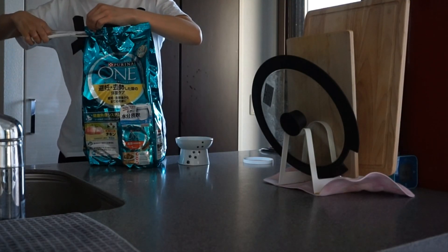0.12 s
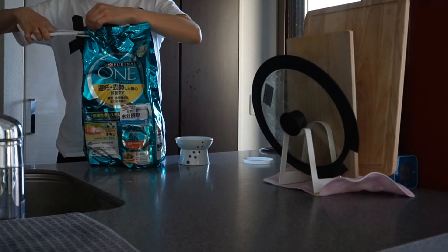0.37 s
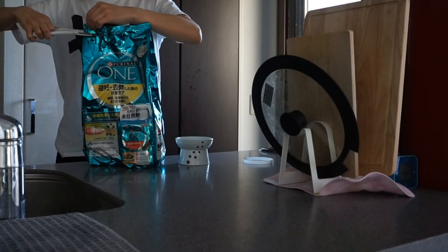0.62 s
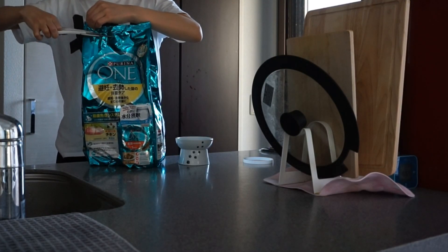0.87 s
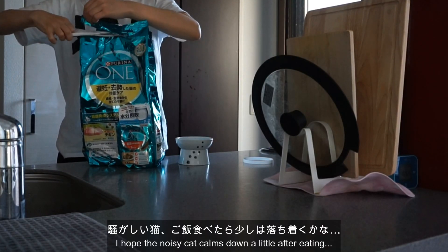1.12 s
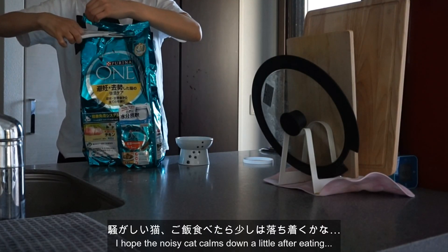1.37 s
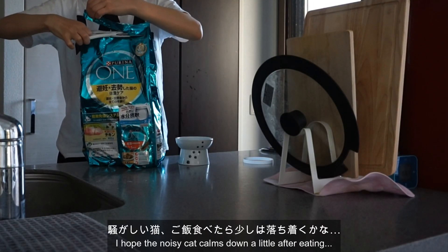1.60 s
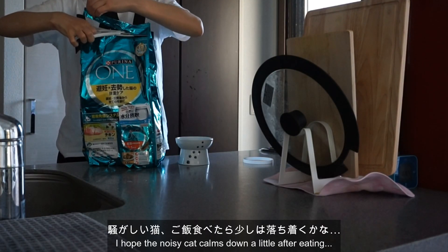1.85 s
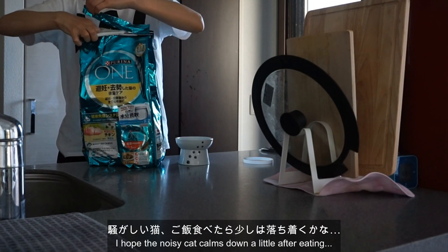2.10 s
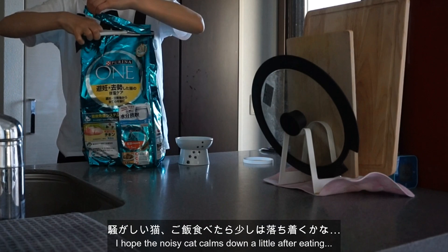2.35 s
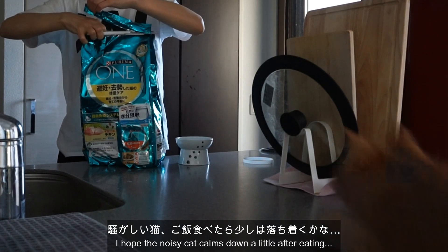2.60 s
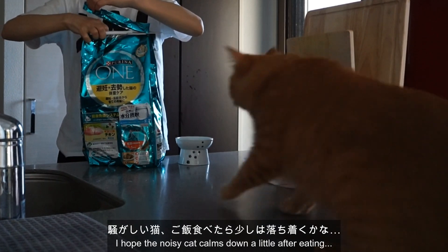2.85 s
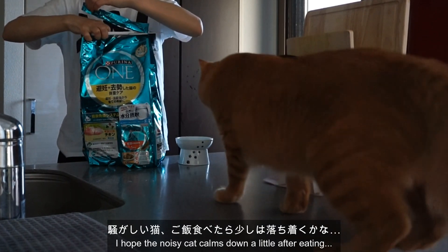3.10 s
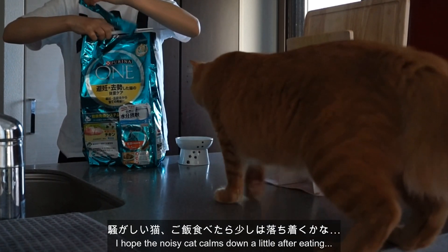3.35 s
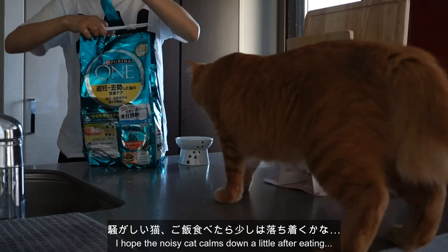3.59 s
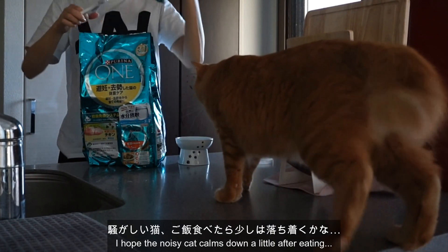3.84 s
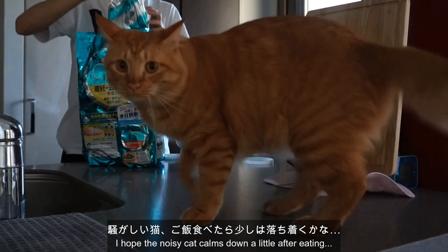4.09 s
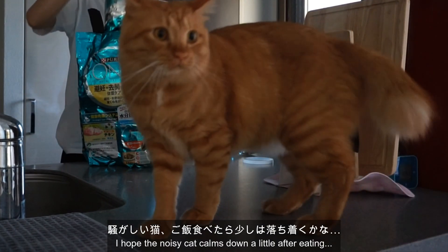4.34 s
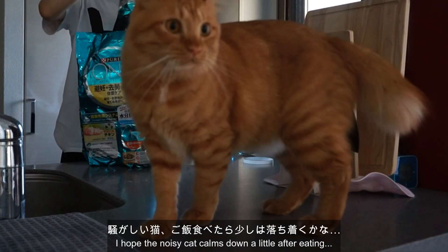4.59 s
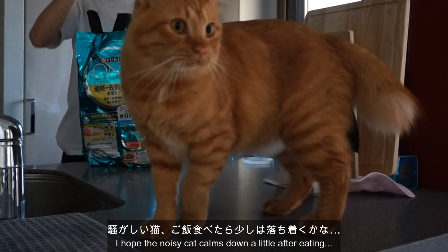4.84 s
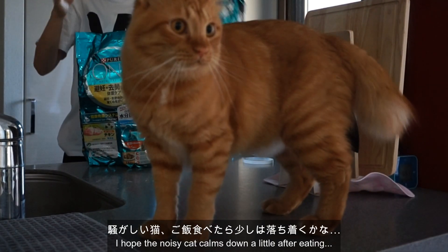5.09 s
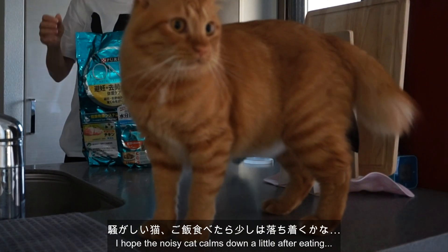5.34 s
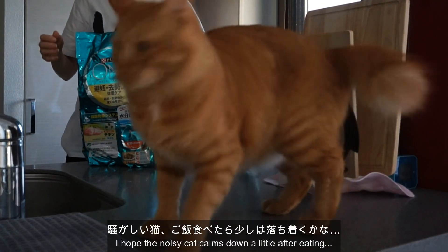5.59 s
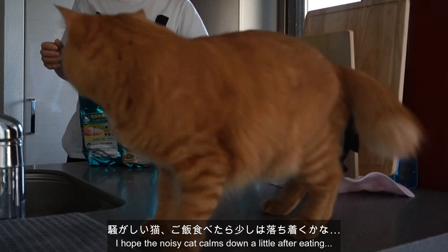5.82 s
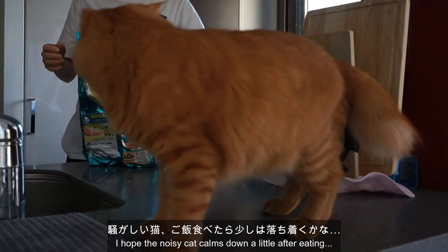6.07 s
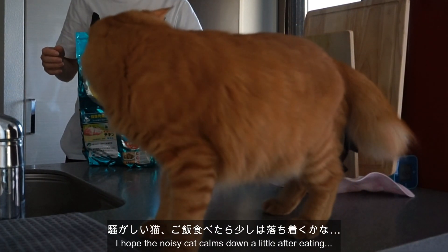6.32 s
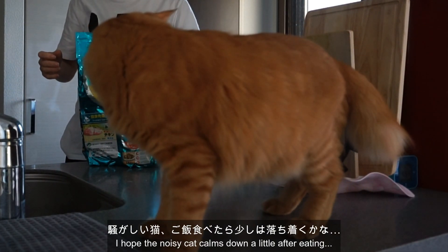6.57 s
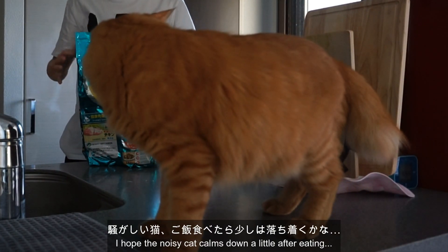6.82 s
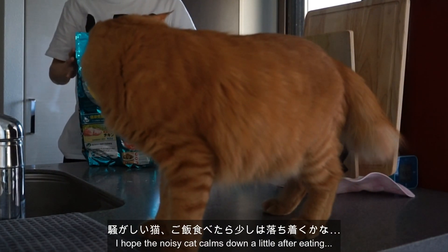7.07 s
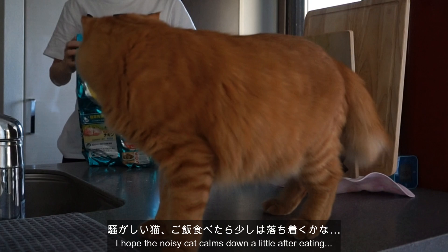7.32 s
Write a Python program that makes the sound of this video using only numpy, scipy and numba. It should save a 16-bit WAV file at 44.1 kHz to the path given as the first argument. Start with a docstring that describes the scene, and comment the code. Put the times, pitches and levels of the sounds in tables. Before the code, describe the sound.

A stiff foil bag crackles and rustles close by in a quiet kitchen, busy at first, thinning out, then snapping sharply again.

```python
"""Foil snaps singly and in swarms, over soft thuds and a faint hum: hands work the top of a tall foil bag
of dry food, a little left of a small recorder on a kitchen counter.
Snaps and rustle are crowds of short sines, panel pops and cracks single ones; resonances add the bag's air.
Filtered noise makes the counter thuds, the dull bag body and the murmur; a sine adds a high whine.
Hard walls answer with decaying noise, the treble dying sooner than the bass."""
import sys
import numpy as np
from scipy import signal
from scipy.fft import rfft, irfft, next_fast_len
from scipy.io import wavfile
from numba import njit

SR = 44100
rng = np.random.default_rng(int(sys.argv[2]) if len(sys.argv) > 2 else 0)


def wrap_up_sound(samples):
    """Save the sound to the file named by the first command line argument, as 16-bit audio."""
    columns = np.atleast_2d(samples).T
    # keep every value between -1 and 1, then stretch to whole-number steps
    tamed = np.clip(columns, -1, 1)
    steps = np.round(tamed * 32767).astype(np.int16)
    wavfile.write(sys.argv[1], SR, steps)


def how_loud(loudness_db):
    """Turn decibels into a plain amplitude multiplier (0 dB gives 1, 20 dB gives 10)."""
    steps = np.asarray(loudness_db, float) / 20
    return 10 ** steps


N = 328104
TIME_S = np.arange(N) / SR
SPOTS = 3  # places on the bag, each with its own echo
OPPOSITE = np.array([[1], [-1]])  # left, right

# Folds giving way. Each row: start in seconds, relative levels of sheet, deep folds and fine wrinkles
# in dB, length in ms.
SNAPS = [(0.035, -52, -74, -64, 2.5), (0.045, -50, -70, -61, 2), (0.1595, -54, -51.5, -64, 1.84),
         (0.189, -46, -63, -53.5, 4.15), (0.249, -56, -62, -69, 3.2), (0.4428, -62, -70, -66, 5.2),
         (0.4623, -39, -44, -40, 6.2), (0.5133, -50, -43.5, -38.5, 1.3), (0.5211, -36, -80, -49, 3.16),
         (0.6021, -44, -74, -54.5, 4.4), (0.6201, -43.5, -49, -61, 3.55), (0.678, -63, -82, -51.5, 4.5),
         (0.7522, -52, -58, -67, 2.6), (0.7739, -43, -49.5, -48, 5.3), (0.8263, -36, -43.5, -39, 4.5),
         (0.9032, -41.5, -47.5, -51.5, 5.4), (0.937, -61, -55, -48, 3.1), (0.981, -32, -35, -55.5, 5.3),
         (0.9914, -38.5, -44, -37.5, 5.6), (1.0122, -31.5, -49, -40.5, 5.9), (1.0241, -41, -45, -34, 5.1),
         (1.045, -39, -46, -71, 8.3), (1.104, -42, -50, -44, 5.8), (1.1674, -46, -49.5, -43.5, 3.2),
         (1.1835, -43, -46, -63, 14), (1.2502, -42, -58, -38, 1.75), (1.2571, -40.5, -49.5, -40.5, 5),
         (1.3376, -38, -51, -43, 14.5), (1.367, -33, -46.5, -40, 3.37), (1.47, -47, -63, -56, 1.55),
         (1.5021, -44, -55.5, -52.5, 15), (1.556, -46, -48.5, -49, 4.6), (1.6004, -45, -56, -60, 2.8),
         (1.612, -45, -55, -62, 3), (1.63, -41, -50.5, -45, 6.5), (1.7012, -49, -85, -55, 7.6),
         (1.7638, -45, -53.5, -57.5, 8.7), (1.8261, -45, -57, -81, 2.4), (1.869, -50, -67, -65, 6.5),
         (1.8808, -49, -53, -53, 9.7), (1.912, -38.5, -66, -53, 5.1), (1.9201, -37.5, -50, -40, 0.96),
         (1.988, -49, -81, -55, 3.4), (2.0765, -47.5, -58, -64.5, 11), (2.13, -49, -59.5, -76, 4.4),
         (2.159, -52, -62, -82, 6), (2.1672, -47, -56, -58, 2.9), (2.1852, -46, -62, -58, 1.7),
         (2.1982, -45.5, -57.5, -54, 11.2), (2.3007, -53.5, -67, -51.5, 11),
         (2.3536, -44.5, -53.5, -47, 3.36), (2.399, -48, -54, -63, 3.65), (2.4752, -37.5, -41, -45.5, 9),
         (2.6363, -44, -52, -71, 2.76), (2.6543, -43, -68, -56, 2.6), (2.6744, -49, -72, -50.5, 7.1),
         (2.7721, -47, -51, -54.5, 7), (2.8103, -47.5, -60, -57, 3.7), (2.9803, -79, -70, -68, 10),
         (3.0244, -58, -63, -61, 4.3), (3.083, -45.5, -80, -63, 2.9), (3.1434, -53.5, -90, -65, 2.2),
         (3.2236, -55.5, -58, -86, 9.3), (3.2466, -48.5, -50, -65, 9), (3.2557, -44.5, -55, -41, 5.4),
         (3.336, -52, -55, -48.5, 2.16), (3.362, -51, -67, -55, 2), (3.3782, -48.5, -76, -70, 3.8),
         (3.5403, -54.5, -98, -55.5, 2.34), (3.5853, -70, -84, -68, 5.2), (3.7083, -68, -69, -81, 4.5),
         (3.83, -68, -93, -67.5, 6.6), (3.851, -65, -84, -71, 3.7), (4.0608, -68, -72, -90, 8.4),
         (4.094, -57, -53, -60, 12.7), (4.0996, -35, -62, -38.5, 3.17), (4.1273, -39, -44, -41, 3.64),
         (4.1495, -45, -59, -49, 1.6), (4.166, -36.5, -46.5, -45, 3.8), (4.1796, -43, -59, -40, 2.6),
         (4.184, -40.5, -56, -35.5, 3.14), (4.191, -50, -53, -70, 3.4), (4.2222, -39.5, -53, -53, 3.8),
         (4.234, -44, -59, -45.5, 4), (4.325, -59, -70, -51, 1.2), (4.353, -36.5, -54, -100, 1.22),
         (4.3637, -48, -57, -53, 9.5), (4.4218, -36, -68, -43, 1.5), (4.4245, -45, -51, -53, 1.52),
         (4.4369, -44.5, -53.5, -56, 4.5), (4.4793, -43.5, -55, -54, 9.3), (4.501, -47, -66, -48.5, 3.7),
         (4.5682, -67, -72, -41.5, 4.7), (4.5804, -40, -53.5, -50.5, 6.9), (4.631, -47, -52.5, -57, 3.6),
         (4.7435, -45.5, -56, -55, 1.9), (4.751, -47.5, -59, -56, 3.5), (4.7997, -45, -56.5, -46, 8.3),
         (4.8188, -49, -77, -53, 2.7), (4.9164, -56, -72, -58, 16.4), (4.997, -60, -77, -61, 3.6),
         (5.043, -54.5, -68, -53.5, 19.3), (5.079, -50, -59.5, -58, 9.9), (5.1501, -73, -49.5, -71, 11.6),
         (5.1784, -55, -66, -57, 4), (5.2947, -52.5, -66, -63, 12.2), (5.3183, -50.5, -69, -65, 6.2),
         (5.4062, -51, -47, -58, 7.9), (5.418, -46.5, -49.5, -48, 6.8), (5.5585, -46.5, -77, -93, 3.1),
         (5.618, -58, -60, -64, 4.5), (5.629, -53, -52, -68, 2.74), (5.8144, -63, -73, -76, 12.6),
         (5.8918, -57.5, -72, -53, 11.5), (5.971, -59, -55, -60, 4.7), (6.0625, -50, -49.5, -82, 6.5),
         (6.0967, -45, -46.5, -47, 2.7), (6.116, -49, -50, -45, 2.8), (6.1358, -48, -43.5, -53, 5.2),
         (6.165, -56, -45.5, -57, 3.5), (6.2805, -48.5, -54.5, -97, 9.7), (6.3064, -80, -64, -56.5, 7),
         (6.396, -55, -62, -62, 7.6), (6.4769, -54, -59, -95, 6.2), (6.9341, -57, -55, -87, 14.3),
         (6.951, -53, -79, -71.5, 3.5), (7.091, -52, -54, -71, 9.4), (7.152, -49, -72, -81, 1.4),
         (7.196, -47, -60, -72, 3.9), (7.2076, -48, -52, -66, 7.3), (7.4018, -40, -45, -48.5, 4.8),
         (7.413, -36.5, -44, -64, 3.35), (7.4228, -33.5, -41, -45, 4.8)]
# Foil creasing on after a snap. Rows for sheet, deep folds, fine wrinkles: dB against the snap, decay in seconds.
SETTLE = [(-5.5, 0.021), (8, 0.024), (-4.5, 0.036)]
# How hard the hands work the foil and how loosely it is held. Each row: time in seconds,
# relative crease level in dB, dullness in dB.
GRIP = [(0, -42, 3), (.14, -56, 6), (.27, -49, -1), (.43, -55.5, 1.5), (.66, -39.5, -0.5),
        (.76, -48.5, 3.5), (.89, -34, 1.5), (.96, -38, 3), (1.08, -34.5, 2), (1.2, -38, -0.5),
        (1.35, -35.5, 1), (1.49, -41, -1), (1.78, -44, 4), (2.03, -47, 2.5), (2.22, -48, 2),
        (2.45, -51.5, 0), (2.65, -42, 3.5), (2.78, -50, 5.5), (3.2, -56.5, 4), (3.42, -52.5, 6),
        (3.65, -60.5, 1), (4.1, -68, 5), (4.28, -43.5, 2), (4.34, -43.5, 2), (4.54, -38, -0.5),
        (4.72, -49, 5), (5.01, -51.5, 1), (5.2, -44.5, 0.5), (5.45, -45.5, 4.5), (5.69, -46.5, 3.5),
        (5.76, -59.5, 4.5), (5.99, -46, 2), (6.16, -34, 3.5), (6.26, -47.5, 2), (6.42, -45, 4.5),
        (6.67, -64, 5.5), (6.92, -68.5, 6.5), (6.96, -51.5, 9), (7.18, -48.5, 5.5), (7.23, -37.5, 4),
        (7.44, -43.5, 6)]
# Pitch of the free panels as they change size under the hands. Each row: time in seconds, Hz.
PANEL_PITCH = [(0.0, 2650), (0.99, 2640), (1.28, 2330), (1.37, 2930), (1.45, 2450), (1.78, 2590),
               (1.84, 2130), (1.88, 2700), (2.15, 2310), (2.22, 2560), (2.61, 2260), (2.65, 2840),
               (2.98, 2420), (3.09, 2970), (3.19, 2500), (4.6, 2580), (4.72, 2330), (4.87, 2670),
               (6.67, 2310), (6.86, 2660), (6.9, 2270), (7.44, 2600)]
# How well bag and microphone pass each crease pitch. Each row: Hz, dB.
BAG_RESPONSE = [(100, -79), (200, -28.5), (330, -1), (480, 1), (800, 4.5), (1500, 2.5), (2800, 4.5),
                (3500, 3.5), (4300, 3), (5500, 2), (7500, 1), (11000, 4), (14500, 3), (17000, -15.5),
                (18500, -16)]
# Flat panels popping. Each row: start in seconds, peak in dB, Hz, time constant in cycles.
PANEL_POPS = [(0.162, -50, 1190, 0.81), (0.4655, -35, 3260, 1.8), (0.775, -35, 2510, 1.6),
              (1.1669, -32, 2650, 1), (0.83, -29, 3200, 1.2), (0.9815, -25, 3060, 1.3),
              (1.104, -36, 2650, 0.92), (1.2575, -29, 2210, 0.87), (1.3673, -34, 2490, 0.93),
              (1.8277, -37.5, 2030, 1.2), (2.4774, -30, 2550, 1.8), (2.636, -41, 1430, 1),
              (2.812, -46, 2550, 1.1), (4.0997, -34, 2340, 1.5), (4.223, -35, 2800, 0.77),
              (4.354, -44, 2500, 1), (4.7435, -42, 1930, 0.91), (0.621, -34.5, 3100, 1.6),
              (2.399, -42, 2050, 0.87), (2.775, -40, 2500, 2.4), (2.886, -49.5, 3480, 2),
              (2.929, -44, 1340, 1.1), (3.047, -43, 2800, 1.6), (3.0835, -39, 2900, 1.4),
              (3.586, -50, 2570, 2.8), (4.1272, -31, 2900, 0.87), (4.179, -40, 443, 1.4),
              (5.151, -44, 592, 0.89), (5.243, -39.5, 1140, 0.72), (5.276, -44, 1330, 0.91),
              (5.354, -49, 468, 1.6), (5.1793, -40.5, 6430, 2.5), (5.187, -46, 6300, 2.5),
              (5.56, -45, 2600, 1.4), (5.63, -44, 1340, 1.1), (5.968, -49, 680, 1.7),
              (6.062, -57, 686, 0.37), (6.091, -43, 880, 0.88), (7.151, -37, 2400, 1.5),
              (7.4, -37, 1250, 0.92)]
# Tightest creases cracking. Each row: start in seconds, peak in dB, Hz.
LOUD_CRACKS = [(0.4439, -44, 9300), (0.461, -29, 11100), (0.5261, -27.5, 11000), (0.5995, -37, 9800),
               (0.8293, -28, 10100), (0.9375, -32, 10500), (0.983, -22.5, 10700), (1.104, -35, 10900),
               (1.25, -41, 10100), (1.2578, -39, 10500), (1.3386, -44, 10600), (1.4715, -41, 9000),
               (1.65, -36, 12000), (1.2337, -36, 9300), (1.366, -41, 10300), (1.56, -33.5, 10100),
               (1.6314, -31, 12000), (1.883, -42, 10300), (1.922, -29, 10600), (2.198, -35, 11600),
               (2.301, -47, 11500), (2.3576, -37.5, 9200), (2.6363, -33, 10100), (3.025, -48, 10400),
               (3.0846, -45, 9600), (3.364, -47, 10500), (3.54, -39, 11300), (4.1, -31, 10100),
               (4.128, -33, 11000), (4.133, -34, 11000), (4.184, -30, 10100), (4.237, -37, 10000),
               (4.3269, -48, 9050), (4.423, -24.5, 10600), (4.5675, -36, 10400), (4.7435, -47, 10900),
               (4.7513, -38, 11300), (4.8006, -42, 10000), (5.4062, -38, 11400)]
# Air in the bag. Each row: time in seconds, drive of the deep ring in dB, drive of the open mouth's ring in dB.
AIR_DRIVE = [(0, -16, -18), (4.0, -9, -39), (4.15, 0.5, -33), (4.65, -3.5, -32), (4.9, -11, -9),
             (5.5, -40, -17), (5.9, -34, -3.5), (6.5, -30, -11.5), (7.0, -26.5, -5), (7.44, -10, -24)]
# Deep ring, then mouth ring: centre in Hz.
AIR_HZ = (468, 677)
# Deep ring, then mouth ring: width in Hz.
AIR_WIDTH_HZ = (140, 190)
# Weight shifting on the counter top. Each row: centre in seconds, level in dB, Hz, 1/e half-length in seconds.
BUMPS = [(.14, -79, 50, 0.068), (0.41, -70.5, 102, 0.08), (.99, -76, 50, 0.018), (1.217, -72, 45.6, 0.046),
         (1.3, -75, 75, 0.068), (1.514, -75, 50, 0.065), (1.793, -82, 51.7, 0.066), (2.42, -77, 41.8, .08),
         (2.497, -60.5, 128, 0.034), (2.55, -69, 50, 0.066), (2.647, -72, 109, 0.034),
         (3.292, -81, 60, 0.084), (4.582, -89, 80.5, 0.034), (5.438, -69, 126, 0.05),
         (7.285, -84, 60, 0.089), (7.44, -78, 69, 0.046)]
# Room decay. Each row: Hz, seconds to fall 60 dB.
ROOM_T60 = [(150, 0.88), (500, 0.33), (1500, 0.36), (4000, 0.22), (9000, 0.19), (15000, 0.17)]
# Echo strength. Each row: Hz, gain in dB.
ROOM_GAIN = [(150, -6.5), (500, -5), (1500, -0.5), (4000, -0.5), (9000, 1), (15000, -1)]
# How diffuse sound differs between the ports. Each row: Hz, amplitude of the opposite part over the common part.
PORT_DIFFERENCE = [(100, 0.19), (300, 0.32), (600, 0.47), (1000, 0.58), (1600, 1.13), (2800, 0.38),
                   (5000, 1.58), (8000, 0.93), (11000, 0.1), (14000, 0.16)]
# Spectrum of the murmur. Each row: Hz, relative density in dB.
HUSH_SPECTRUM = [(15, -36), (25, -10), (80, -47), (97, 2), (118, -9), (147, -2), (255, -3.5), (285, -3),
                 (671, -6), (1670, -29), (2600, -40), (7230, -29.5), (14800, -26.5), (17000, -21),
                 (18500, -40)]
# Faint hums in the murmur. Each row: Hz, width in Hz, added gain in dB.
HUMS = [(171, 15, 2.5), (676, 58, 0), (2450, 150, 24)]
# High whine. Each row: Hz, rms in dB.
WHINE = [(15735, -102)]
# Level between the ports. Each row: Hz, left minus right in dB.
LEFT_OVER_RIGHT = [(100, 1), (500, 3), (2500, 2), (5000, 4.5), (9000, 4), (14000, 7)]
# Phase between the ports. Each row: Hz, radians by which left leads (negative: lags).
LEFT_LEAD = [(40, 0), (120, -.26), (320, -.9), (1000, -1.22), (2200, -.92), (3600, -.45), (4500, -.75),
             (8000, -.1), (10000, 0)]

WRINKLE_PER_DULL = 1.83  # dB of wrinkle lost per dB of dullness


def along(table, hz):
    """Read a (Hz, value) table on a log axis."""
    f, v = np.transpose(table)
    return np.interp(np.log(hz + 1), np.log(f + 1), v)


def shape(x, gain):
    """Multiply the spectrum by gain(Hz)."""
    n = next_fast_len(x.shape[-1] + SR // 10)
    hz = np.arange(n // 2 + 1) * SR / n
    return irfft(rfft(x, n) * gain(hz), n)[..., :x.shape[-1]]


def level(x, db):
    """Set the rms level."""
    return x * how_loud(db) / np.sqrt(np.mean(x ** 2))


def peak(f, hz, width_hz):
    """A resonance, gain 1 at its centre."""
    return 1j * f * width_hz / (hz ** 2 - f ** 2 + 1j * f * width_hz)


def after(s, db, decay_s, ahead=False):
    """Power that jumps at each time and dies away, or swells up to it."""
    kicks = np.zeros(N)
    np.add.at(kicks, np.clip((s * SR).astype(int), 0, N - 1), how_loud(2 * db))
    way = -1 if ahead else 1
    return signal.lfilter([1], [1, -np.exp(-1 / (decay_s * SR))], kicks[::way])[::way]


@njit
def rings(start, hz, tau, size, spot, spots, n, sr):
    """One sine per start time; its envelope t*exp(-t/tau) peaks at size/e after one time constant."""
    out = np.zeros((spots, n))
    for k in range(len(start)):
        turn = np.exp(complex(-1 / (tau[k] * sr), 2 * np.pi * hz[k] / sr))
        z = complex(size[k] / (tau[k] * sr), 0.)
        first = max(int(start[k] * sr), 0)
        for j in range(first, min(first + int(8 * tau[k] * sr) + 2, n)):
            out[spot[k], j] += (j - first) * z.imag
            z *= turn
    return out


def single_rings(s, db, hz, cycles):
    """Rings of given peak level, dealt to the spots in turn."""
    spot = np.arange(len(s)) % SPOTS
    return rings(s, hz, cycles / hz, how_loud(db) * np.e, spot, SPOTS, N, 1. * SR)


def creases(start_s, chance, sheet_db, fold_db, wrinkle_db, cycles):
    """Each crease rings a few cycles at its own pitch and a random spot; a few are much louder than the rest."""
    fold_hz, wrinkle_hz = 664, 10100
    panel_db, panel_octaves, scatter_db = 2, 0.23, 2.0
    hz = 150 * (18000 / 150) ** chance[..., 0]
    sheet_hz = np.interp(start_s, *np.transpose(PANEL_PITCH))
    octaves_off = np.log2(hz / sheet_hz)
    low = np.clip(octaves_off / np.log2(fold_hz / sheet_hz), 0, 1)
    high = np.clip(octaves_off / np.log2(wrinkle_hz / sheet_hz), 0, 1)
    db = sheet_db + low * (fold_db - sheet_db) + high * (wrinkle_db - sheet_db)
    db = db + along(BAG_RESPONSE, hz)
    # creases near the panels' pitch sound out more
    db = db + panel_db * np.exp(-(octaves_off / panel_octaves) ** 2)
    db = db - scatter_db * (np.log(chance[..., 1] + 0.002) + 1)
    # even the finest wrinkle rings a fraction of a millisecond
    tau_s = cycles / hz + 0.0003
    size = how_loud(db) / np.sqrt(tau_s * SR)
    spot = (chance[..., 3] * SPOTS).astype(int)
    return rings(start_s.ravel(), hz.ravel(), tau_s.ravel(), size.ravel(), spot.ravel(), SPOTS, N, 1. * SR)


def snaps(count=120):
    """A fold gives way as a cluster of creases over all pitches; a longer one holds more energy."""
    cluster_db = 11
    s, sheet_db, fold_db, wrinkle_db, ms = np.array(SNAPS).T[:, :, None]
    chance = rng.random((len(SNAPS), count, 4))
    # one crease in each of count equal pitch slots, in random order
    slots = np.tile(np.arange(count), (len(SNAPS), 1))
    chance[..., 0] = rng.permuted(slots + chance[..., 0], axis=1) / count
    length_s = np.clip(ms, .5, 40) / 1000
    late_s = length_s * .9 * (-np.log(1 - chance[..., 2])) ** 1.3
    # finer wrinkles let go sooner
    late_s = late_s * np.clip(1.25 - .85 * chance[..., 0] ** 2, .1, 2)
    gain_db = 10 * np.log10((length_s + 0.00032) * SR / count) + cluster_db
    return creases(s + late_s, chance, sheet_db + gain_db, fold_db + gain_db, wrinkle_db + gain_db, cycles=1.34)


def rustle(count=70000):
    """Thousands of small creases a second, in flurries, driven by the grip and by foil giving around snaps."""
    fold_share_db, wrinkle_share_db = -5.5, -4.5  # against the sheet
    strain_db, strain_s = -2.5, 0.0013  # creases gather just before a snap
    chance = rng.random((count, 4))
    start_s = chance[:, 2] * N / SR
    at = (start_s * SR).astype(int)
    flurry = np.repeat(rng.standard_normal(N // 128 + 1), 128)[at]
    grip_s, grip_db, dull_db = np.transpose(GRIP)
    pressed_db = (grip_db,
                  grip_db + fold_share_db + dull_db,
                  grip_db + wrinkle_share_db - WRINKLE_PER_DULL * dull_db)
    snap_s, *snap_db = np.transpose(SNAPS)[:4]
    crease_db = []
    for pressed, db, (settle_db, settle_s) in zip(pressed_db, snap_db, SETTLE):
        power = how_loud(2 * np.interp(start_s, grip_s, pressed))
        power = power + after(snap_s, db + settle_db, settle_s)[at]
        power = power + after(snap_s, db + strain_db, strain_s, ahead=True)[at]
        crease_db.append(10 * np.log10(power) + 2.95 * flurry)
    return creases(start_s, chance, *crease_db, cycles=1.39)


def panel_pops():
    """A flat panel pops at a pitch of its own."""
    s, db, hz, cycles = np.array(PANEL_POPS).T
    return single_rings(s, db, hz, cycles)


def cracks(count=900):
    """Very short rings of the finest foil: listed loud cracks, and many small ones that follow the grip."""
    chance = rng.random((3, count))
    grip_s, grip_db, dull_db = np.transpose(GRIP)
    small_s = chance[0] * N / SR
    small_db = np.interp(small_s, grip_s, grip_db - WRINKLE_PER_DULL * dull_db)
    small_db = small_db - 9 - 2 * np.log(chance[1] + 0.0088)
    small_hz = 2500 * 5 ** chance[2]
    s, db, hz = np.hstack([np.transpose(LOUD_CRACKS), [small_s, small_db, small_hz]])
    return single_rings(s, db, hz, cycles=1)


def bag_air(foil):
    """The foil drives two air resonances, a deep ring and the open mouth's."""
    s, *drives_db = np.transpose(AIR_DRIVE)
    air = 0
    for drive_db, hz, width_hz in zip(drives_db, AIR_HZ, AIR_WIDTH_HZ):
        driven = foil * how_loud(np.interp(TIME_S, s, drive_db))
        air = air + shape(driven, lambda f: 2 * peak(f, hz, width_hz))
    return air


def bag_body():
    """The full bag answers deep folds and the grip with dull resonant noise."""
    body = shape(rng.standard_normal(N), lambda f: peak(f, 205, 168) ** 3)
    snap_s, _, fold_db = np.transpose(SNAPS)[:3]
    grip_s, grip_db, dull_db = np.transpose(GRIP)
    power = after(snap_s, fold_db - 22.5, decay_s=0.041)
    power = power + how_loud(2 * np.interp(TIME_S, grip_s, grip_db + dull_db - 39))
    return level(body, 0) * np.sqrt(power)


def counter():
    """Shifting weight thuds through the counter as bursts of resonant noise over a steady rumble."""
    mid, side = rng.standard_normal((2, N))
    noise = mid + .14 * side * OPPOSITE
    out = level(shape(noise, lambda f: peak(f, 66, 45) ** 2), -91.5)
    for s, db, hz, length_s in BUMPS:
        thud = level(shape(noise, lambda f: peak(f, hz, 1.6 * hz) ** 3), db)
        out = out + thud * np.exp(-((TIME_S - s) / length_s) ** 2)
    return out


def kitchen(x):
    """Walls answer each spot in their own way, after a few ms, with noise that decays band by band."""
    t = np.arange(SR * 3 // 4) / SR
    tail = 0
    for hz in 90 * 2 ** np.arange(0, 8, .5):
        noise = rng.standard_normal((2, SPOTS, len(t)))
        band = shape(noise, lambda f: np.exp(-(4 * np.log2((f + 1) / hz)) ** 2 / 2))
        fade = np.exp(-np.log(1000) * t / along(ROOM_T60, hz)) * np.clip(t / 0.0048 - .3, 0, 1)
        common, opposite = band * fade / np.sqrt(np.sum(fade ** 2)) * how_loud(along(ROOM_GAIN, hz))
        tail = tail + common + along(PORT_DIFFERENCE, hz) * opposite * OPPOSITE[:, :, None]
    return signal.fftconvolve(x[None], tail, axes=2)[..., :N].sum(axis=1)


def hush():
    """Steady kitchen murmur of machines and air as shaped noise, with a thin high whine."""
    def spectrum(f):
        hums = sum(how_loud(db) * abs(peak(f, hz, width_hz)) ** 2 for hz, width_hz, db in HUMS)
        return how_loud(along(HUSH_SPECTRUM, f)) * (1 + hums)

    mid, side = shape(rng.standard_normal((2, N)), spectrum)
    # the murmur differs twice as much between the ports as the echo
    side = shape(side, lambda f: 2.0 * along(PORT_DIFFERENCE, f))
    whine = sum(np.sqrt(2) * how_loud(db) * np.sin(2 * np.pi * hz * TIME_S) for hz, db in WHINE)
    return level(mid + side * OPPOSITE, -74.5) + whine


def scene():
    """Bag and its echo, counter and hush."""
    # a thin sheet radiates no deep bass
    foil = shape(snaps() + rustle(), lambda f: (1j * f / 170) ** 3 / (1 + 1j * f / 170) ** 3)
    bag = foil + bag_air(foil)
    pops = panel_pops() + cracks()
    direct = (bag + pops).sum(axis=0)
    # panels facing the recorder beam pops and cracks at it; the walls get 4 dB less
    echo = kitchen(bag + how_loud(-4) * pops)
    return direct + echo + bag_body() + counter() + hush()


def band_limit(x):
    """A steep low-pass at the top of the band."""
    return signal.sosfilt(signal.butter(12, 18960, fs=SR, output="sos"), x)


def record(dry):
    """The left port is louder and out of step with the right; the top is cut at 18900 Hz."""
    half = OPPOSITE / 2

    def port_gain(f):
        gain = how_loud(half * along(LEFT_OVER_RIGHT, f))
        return gain * np.exp(1j * half * along(LEFT_LEAD, f)) * (f < 18900)

    return band_limit(shape(dry, port_gain))


dry = scene()
out = record(dry)
wrap_up_sound(out)
```